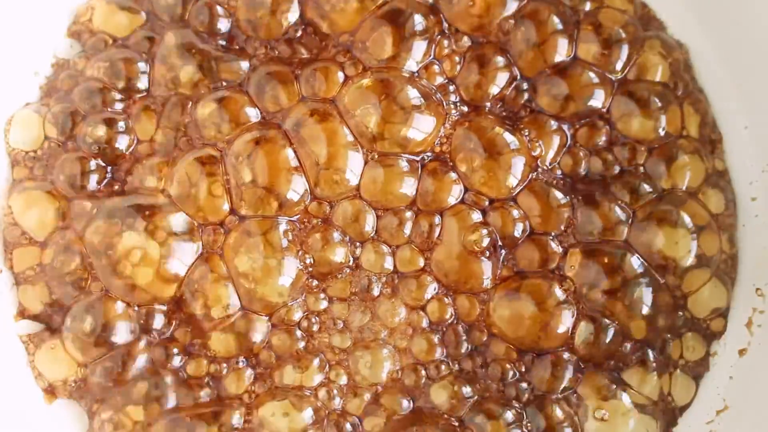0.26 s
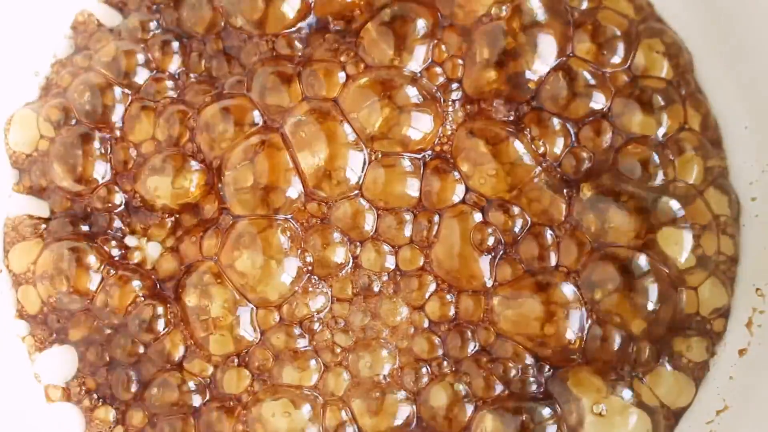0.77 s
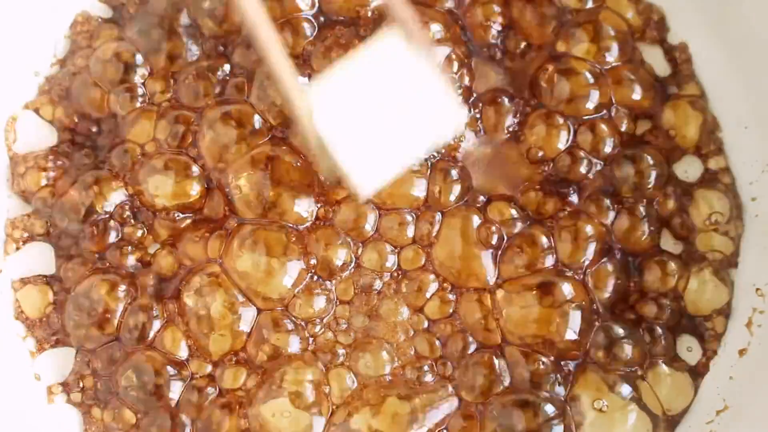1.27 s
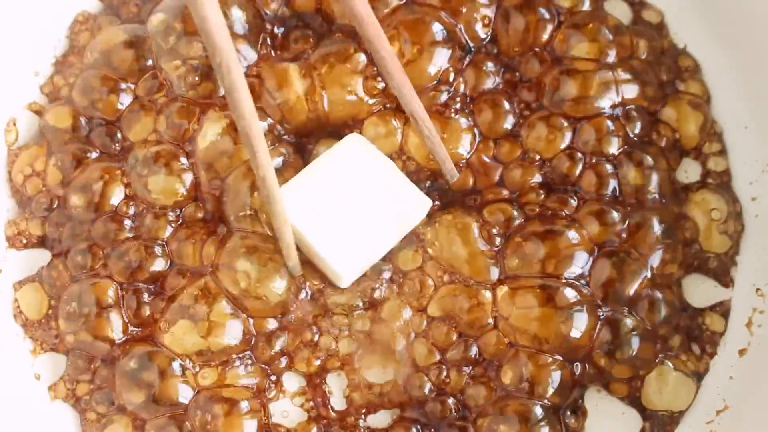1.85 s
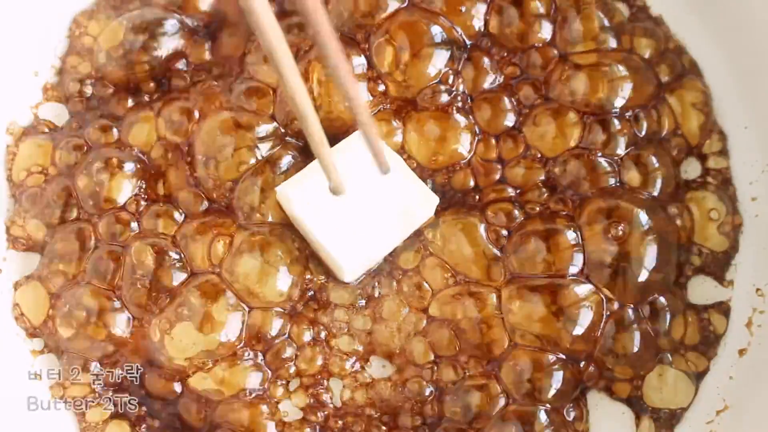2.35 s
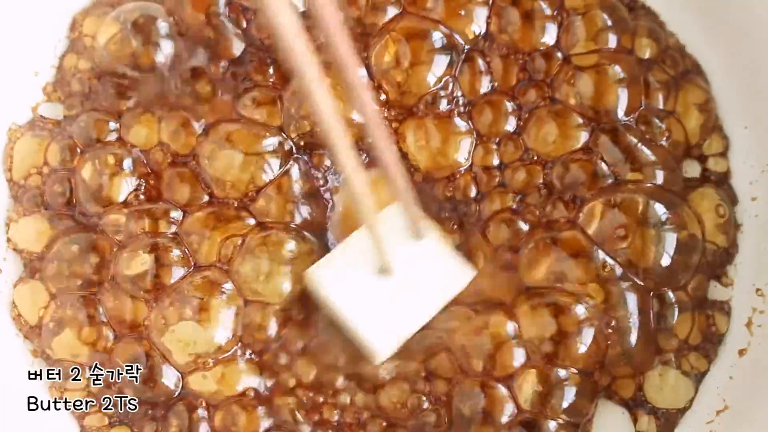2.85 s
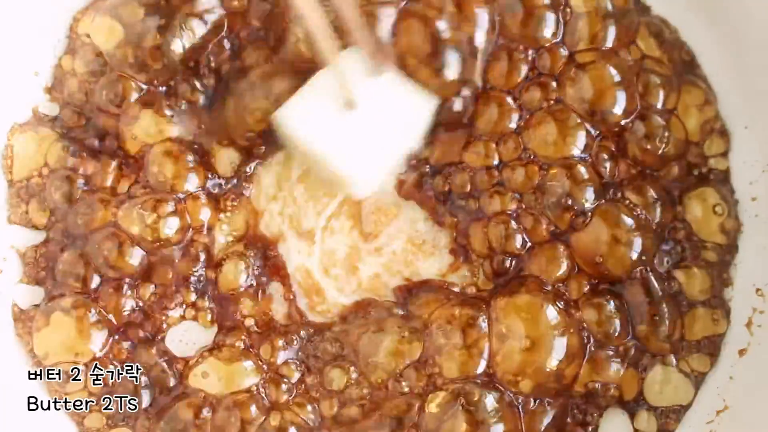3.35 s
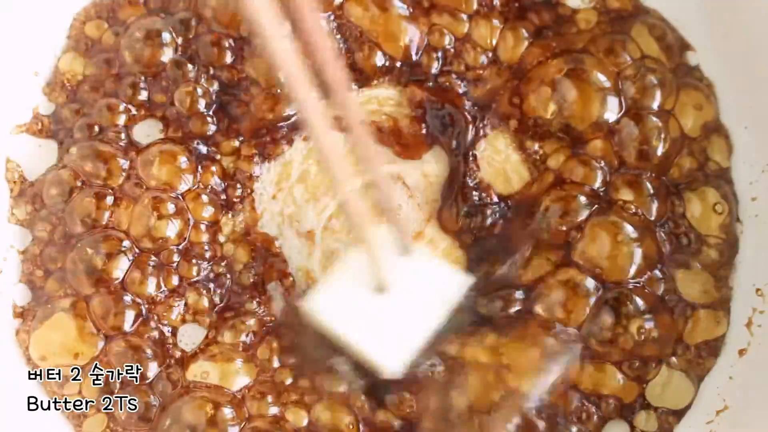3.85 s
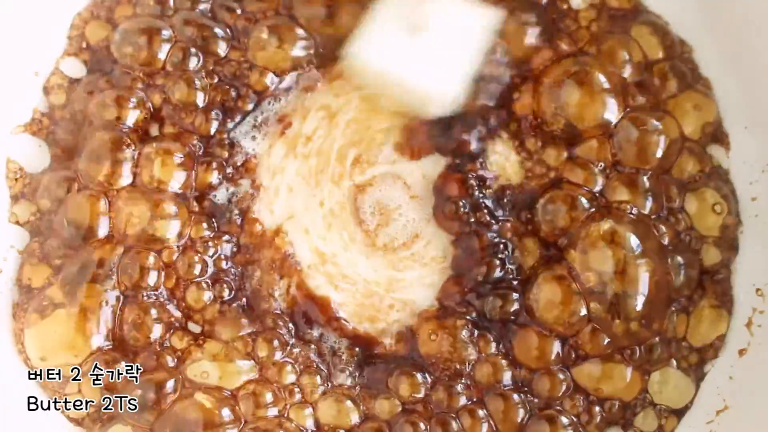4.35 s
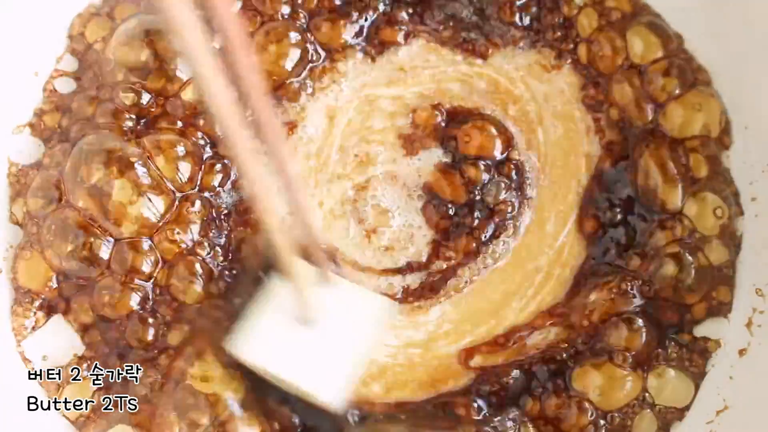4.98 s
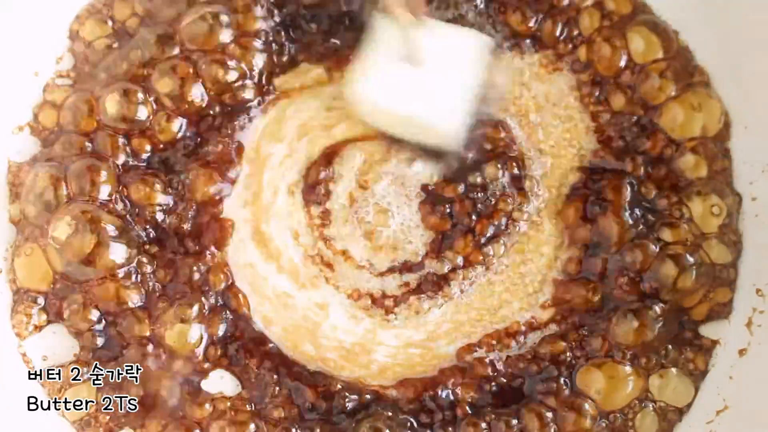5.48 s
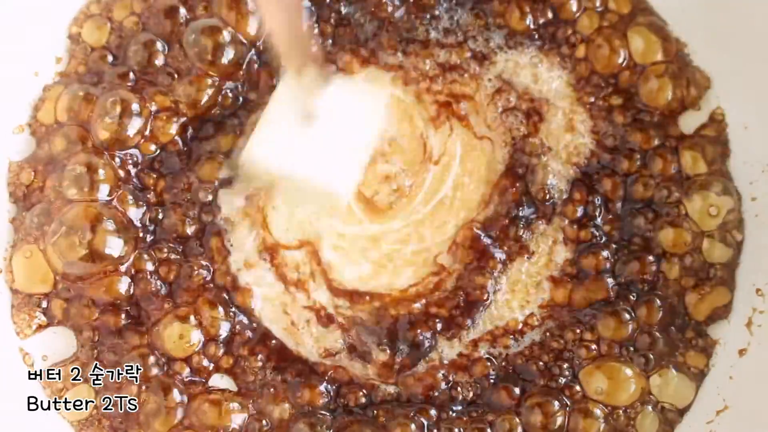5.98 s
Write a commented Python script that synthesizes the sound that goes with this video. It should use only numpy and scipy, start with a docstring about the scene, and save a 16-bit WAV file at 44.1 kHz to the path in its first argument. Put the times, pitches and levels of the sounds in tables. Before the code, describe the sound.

A portable gas burner roars softly and evenly, its thin high whistle wavering and flicking upward. Bubbling syrup sizzles faintly, with a cluster of sharp snaps near two seconds. From three seconds, butter stirred round the pan makes the sizzle thicken, with juddering hollow rubs and tiny wet plops. Low air rumble thumps throughout, strongest at the end. Close microphone, small dry kitchen, mono.

```python
"""Sugar syrup boils in a frying pan: small bubbles sizzle as dense short pings and larger ones snap.
Chopsticks stir a cube of butter round it; the sizzle thickens as the butter melts.
The strokes rub the pan as resonant, juddering noise and squeeze out soft plops of sagging pitch.
Beneath, a portable gas stove roars as coloured noise, hums in narrow bands and whistles at its jet.
Hot air buffets the microphone: swelling low-frequency noise makes the rumble and thumps."""
import sys
import numpy as np
from scipy import signal
from scipy.fft import rfft, irfft, next_fast_len
from scipy.io import wavfile
from scipy.ndimage import uniform_filter1d

SR = 44100
rng = np.random.default_rng(int(sys.argv[2]) if len(sys.argv) > 2 else 0)


def waveform_to_disk(signal):
    """Save audio, clipped to [-1, 1], as 16-bit WAV at the path in sys.argv[1]."""
    frames = np.transpose(np.atleast_2d(signal))
    scaled = np.clip(frames, -1, 1) * 32767
    samples = np.round(scaled).astype(np.int16)
    wavfile.write(sys.argv[1], SR, samples)


N = 274302
PADDED = next_fast_len(N, True)
TIME, HZ = np.arange(N) / SR, np.fft.rfftfreq(PADDED, 1 / SR)

# Frying flares as the cold butter lands, then grows as water leaves it: t/s, relative level/dB
FRYING_LEVEL = [(0, -51), (1.1, -53), (1.8, -46), (2.5, -51.5), (3.1, -44), (3.8, -41), (4.05, -38),
                (4.55, -39.5), (5.3, -37.5), (6.22, -37)]
# Spectrum of the sizzle: f/Hz, relative level/dB
SIZZLE_SPECTRUM = [(800, -44), (2500, -6.5), (4000, -3), (5200, -1), (7500, -2.5), (8900, 1.5),
                   (10800, -8.5), (12500, -4.5), (14200, -5), (15700, -14)]
# Bursts of larger bubbles: t/s, relative level over one millisecond/dB, centre f/Hz, spread/octave
LARGE_BUBBLES = [(.4993, -18, 7350, 0.14), (1.6065, -30, 12400, .15), (1.6745, -25, 6900, .2),
                 (1.713, -24.5, 5000, .11), (1.8498, -23, 5860, .25), (1.8627, -24, 6500, 0.41),
                 (1.871, -22, 7150, .28), (1.877, -25, 7000, .33), (1.9053, -20, 5600, .21),
                 (1.9331, -25, 7500, .35), (1.9938, -10.5, 6160, 0.43), (2.001, -19, 5200, 0.45),
                 (2.0025, -16, 5700, .45), (2.0102, -16, 6600, .28), (2.996, -24, 8300, .28),
                 (3.767, -25, 12000, .25), (3.984, -22, 11500, 0.47), (4.096, -22, 8950, 0.079),
                 (4.1445, -25, 13300, .1), (4.2198, -24, 13500, .25), (4.392, -23, 12400, .2),
                 (4.597, -19, 6760, 0.18), (4.9145, -17, 6500, .38), (4.9285, -21, 9000, .3),
                 (4.956, -20, 8000, .34), (4.9608, -13.5, 8840, .2), (4.961, -9, 14600, .13),
                 (5.0608, -20, 6460, 0.13), (5.231, -19, 14200, .18), (5.3719, -19, 9000, 0.74),
                 (5.426, -18.5, 7160, 0.22), (5.632, -26, 10600, 0.19), (5.679, -15.5, 10500, 0.52),
                 (5.764, -22, 8600, .48), (5.8022, -14.5, 10900, .22), (5.8514, -18, 7900, 0.16),
                 (6.1864, -17, 8800, 0.11)]
# Response of the pan's wall to a snap: f/Hz, gain/dB
PAN_WALL_RESPONSE = [(2000, 9.5), (5000, -2), (7000, -3.5), (8800, -1), (10800, -7.5), (12500, -1.5),
                     (14500, -6), (16000, 0)]
# Steam pockets in the stirred syrup: t/s, relative peak level/dB, first f/Hz, limiting f/Hz, time scale/s
STEAM_POCKETS = [(1.466, -24.5, 716, 660, 0.003), (1.519, -19, 1160, 990, 0.0014),
                 (1.525, -26, 716, 620, .0027), (1.555, -19.5, 774, 484, 0.0022),
                 (1.56, -21.5, 670, 585, .004), (2.702, -29, 785, 700, 0.0038),
                 (2.998, -22, 1320, 1230, .0037), (3.04, -27, 720, 640, 0.0031),
                 (3.044, -24, 1200, 990, 0.0069), (3.178, -23, 1200, 850, 0.0047),
                 (3.187, -22.5, 760, 450, 0.0059), (3.217, -22.5, 1090, 700, .0013),
                 (3.901, -22, 520, 280, 0.0013), (4.397, -17, 730, 600, 0.0015),
                 (4.413, -24, 750, 650, 0.0021), (4.451, -27.5, 720, 600, 0.0028),
                 (4.48, -28, 766, 726, 0.0041), (4.755, -27, 630, 564, 0.0022),
                 (4.866, -24.5, 680, 620, 0.0017), (5.015, -23, 730, 560, 0.0021),
                 (5.192, -21.5, 730, 450, 0.002), (5.403, -20, 850, 524, 0.0033)]
# Spectrum of the wet splash round a plop: f/Hz, relative level/dB
SPLASH_SPECTRUM = [(100, 4), (240, 2), (450, -11), (700, -2), (1200, -2), (2500, -24), (5000, -32)]
# Strokes that rub the butter over the pan's bottom: start t/s, length/s, relative level/dB
STIRRING_STROKES = [(2.95, 0.48, -38), (3.874, 0.65, -37), (4.986, 0.51, -35.5), (5.85, 0.14, -37)]
# Resonances of the rubbed pan: f/Hz, width/Hz, relative level/dB
RUB_RESONANCES = [(268, 690, -16.5), (1246, 94, -1), (1420, 270, -6.5)]
# Spectrum of the flame: f/Hz, relative level/dB
FLAME_SPECTRUM = [(100, 0.5), (160, -9), (250, -7.5), (440, -12.5), (700, -1), (860, -5.5), (1030, 1.8),
                  (1500, -1), (2100, 0.94), (2450, -2.4), (3100, -7.5), (4500, -12.5), (6500, -13.5),
                  (9000, -20), (10500, -24), (16000, -25)]
# Roar of the flame before flutter: t/s, level/dB
FLAME_LEVEL = [(0, -33.5), (6.22, -35)]
# Narrow bands of the stove, low hums and jet whistles: f/Hz, width/Hz, level/dB
STOVE_BANDS = [(221, 6.9, -50), (266.7, 11, -57), (371, 34, -58), (5005, 41, -55), (6590, 48, -49),
               (6200, 19, -66), (6820, 18, -54), (7190, 61, -48), (8000, 49, -61.5), (8340, 50, -54)]
# Main whistle of the gas jet before sway and dips: t/s, level/dB
JET_LEVEL = [(0, -37.5), (.25, -46), (.68, -35), (1.3, -40.5), (1.85, -42), (3.35, -36.5), (3.7, -41.5),
             (6.22, -40.5)]
# Brief slips of the jet into its upper whistle: t/s, peak level/dB
JET_SLIPS = [(1.12, -34), (1.79, -38), (1.915, -34.5), (2.33, -37), (2.392, -41), (2.52, -38), (2.82, -38),
             (3.65, -36), (3.852, -36), (4.035, -33), (4.484, -37), (5.69, -40)]
# Air flow between puffs: t/s, large-eddy relative level/dB, small-eddy relative level/dB
AIR_FLOW = [(0, -28.5, -61), (.62, -24.5, -46), (.88, -22, -41), (1.38, -22, -54), (1.7, -21, -34.5),
            (2.2, -18.5, -43), (2.9, -19.5, -31.5), (3.6, -18.5, -36.5), (5.3, -19, -41),
            (5.85, -11.5, -22), (6.22, -11, -20.5)]
# Puffs of hot air: t/s, relative level/dB, relative length/s, small eddies relative to large/dB
AIR_PUFFS = [(0.716, -13, 0.032, -28), (0.894, -13.5, 0.088, -14), (1.163, -10, 0.08, -20),
             (1.466, -11.5, 0.078, -23), (1.708, -8, 0.042, -12), (1.88, -11.5, 0.062, -21),
             (1.993, -11, 0.086, -20), (2.218, -8, 0.032, -19), (2.39, -13, 0.064, -23),
             (2.656, -7.5, 0.028, -14), (2.747, -11.5, 0.034, -25), (2.889, -16, 0.038, -7),
             (3.162, -16, 0.04, -5), (3.316, -14, 0.082, -12.5), (3.513, -6.5, 0.028, -19),
             (3.613, -6, 0.042, -33), (3.734, -11, 0.085, -30), (4.008, -12, 0.043, -8),
             (4.12, -7.5, 0.023, -19), (4.198, -12, .05, -20), (4.354, -6.5, 0.021, -12),
             (4.492, -3.5, 0.03, -26), (4.706, -11.5, 0.093, -12), (4.828, -10.5, 0.019, -17),
             (5.243, -10, 0.027, -33), (5.363, -15, 0.046, -10), (5.482, -12, 0.1, -34),
             (5.563, -18, 0.03, -23), (5.727, -9, 0.018, -10), (5.802, -4.5, 0.035, -17),
             (6.166, -11.5, 0.034, -6)]
# Spectrum of the large eddies: f/Hz, relative level/dB
LARGE_EDDY_SPECTRUM = [(8, -13), (18, 2), (27, 6), (39, -1), (50, -6), (63, -21.5), (80, -35.5), (125, -43),
                       (400, -100)]
# Spectrum of the small eddies: f/Hz, relative level/dB
SMALL_EDDY_SPECTRUM = [(40, -14), (58, 6), (68, 7.5), (80, -5), (100, -14.5), (125, -26), (180, -39),
                       (400, -57)]


def sizzle(sparse_per_s=1200, dense_per_s=8000, spread_db=5.5, cycles=2.9, clump_db=2.0, clump_hz=45, hiss_db=-2):
    """Superposition of damped oscillations: tiny steam bubbles burst more often in harder frying."""
    frying = level(FRYING_LEVEL)
    per_s = sparse_per_s + dense_per_s * frying / frying.max()
    bursts = rng.random(N) < per_s / SR
    strength = np.minimum(rng.exponential(1, N), 4.5)
    sign = rng.choice([-1, 1], N)
    pitches = np.geomspace(2000, 15500, 32)
    which = rng.choice(len(pitches), N, p=pitches / pitches.sum())  # higher pitches are likelier
    t = TIME[:256]
    pings = np.zeros(N + len(t))
    for k, hz in enumerate(pitches):
        at = np.flatnonzero(bursts & (which == k))
        ping = unit(np.sin(2 * np.pi * hz * t) * np.exp(-t * hz / cycles))
        # dividing by the root of the rate leaves the level to the frying curve
        sizes = sign[at] * amp(spread_db * strength[at]) / np.sqrt(per_s[at])
        places = at[:, None] + np.arange(len(t))
        pings += np.bincount(places.ravel(), np.outer(sizes, ping).ravel(), len(pings))
    grains = unit(colour(pings[:N], SIZZLE_SPECTRUM))
    hiss = unit(colour(noise(), SIZZLE_SPECTRUM))
    return frying * amp(clump_db * drift(clump_hz)) * (grains + amp(hiss_db) * hiss)


def snaps(snap_db=1, spray_db=-5, spray_s=0.0018, spray_rise_s=0.00088, skirt_db=-29):
    """Impulse response of a bubble wall: a tear gives a sharp ringing crack and a short spit of steam."""
    out, t, hz = np.zeros(N), TIME[:2048], np.fft.rfftfreq(2048, 1 / SR)
    # fainter bubbles burst by chance, 2.5 per second
    faint = [(s, db, 12000, 0.2) for s, db in by_chance(2.5, -37)]
    for s, db, centre_hz, octaves in LARGE_BUBBLES + faint:
        away = np.log2((hz + 1) / centre_hz)
        peak = np.exp(-(away / (2 * octaves)) ** 2)
        band = peak + amp(skirt_db) / (1 + (away / 2) ** 2)
        # minimum phase: the ring starts at once, then dies away
        log_gain = np.log(np.r_[band, band[-2:0:-1]])
        ring = np.fft.ifft(np.exp(np.conj(signal.hilbert(log_gain)))).real
        spray = rng.standard_normal(len(t)) * np.exp(-t / spray_s) * (1 - np.exp(-t / spray_rise_s))
        spit = irfft(rfft(spray) * rfft(ring))
        crack = unit(ring) + amp(spray_db) * unit(spit)
        one_ms = SR / 1000  # samples over which the energy is reckoned
        add(out, s, amp(db + snap_db) * crack * np.sqrt(one_ms / np.sum(crack ** 2)))
    return out


def plops(plop_db=-1.5, sag=0.89, splash_db=-11, splash_s=0.0088):
    """Cavity oscillation: each pocket's pitch sags as it swells, and the syrup splashes shut."""
    rings, splashes, t = np.zeros(N), np.zeros(N), TIME[:3000]
    for s, db, first_hz, last_hz, length in STEAM_POCKETS:
        age = t / length
        hz = last_hz + (first_hz - last_hz) * np.exp(-sag * age)
        swell = 2 * age * np.exp(1 - 2 * age)  # peaks at half the time scale
        add(rings, s, amp(db) * swell * np.sin(2 * np.pi * np.cumsum(hz) / SR))
        add(splashes, s, amp(db) * np.exp(-t / splash_s) * (1 - np.exp(-10 * age)))
    wet_noise = unit(colour(noise(), SPLASH_SPECTRUM))
    return amp(plop_db) * rings + amp(splash_db) * splashes * wet_noise


def stirring(rub_db=-1, judder_db=3, judder_hz=71, attack_s=0.032, release_s=0.15, ease_db_per_s=3.5):
    """Friction-driven resonance: butter judders over the pan; a stroke bites, eases and lets go."""
    pressure = np.zeros(N)
    for start, length, db in STIRRING_STROKES:
        age = np.maximum(TIME - start, 0)
        attack = np.minimum(age / attack_s, 1)
        release = np.exp(-np.maximum(age - length, 0) / release_s)
        pressure += amp(db - ease_db_per_s * age) * attack * release
    rub = sum(amp(db) * resonance(hz, width) for hz, width, db in RUB_RESONANCES)
    rub = rub * amp(judder_db * drift(judder_hz))
    return amp(rub_db) * pressure * unit(rub)


def kitchen(x, wet_db=-12, t60=0.2):
    """Reverberation: sparse decaying reflections from the pan wall, the counter and the room."""
    t = TIME[:12000]
    echoes = rng.standard_normal(len(t)) * (rng.random(len(t)) < .1) * (t > .002)
    tail = echoes * amp(-60 * t / t60)
    return x + amp(wet_db) * signal.fftconvolve(x, tail / np.linalg.norm(tail))[:N]


def flame(flutter_db=1.03, flutter_hz=30):
    """Combustion noise: the turbulent flame roars in a broad band and flutters."""
    roar = unit(colour(noise(), FLAME_SPECTRUM))
    return level(FLAME_LEVEL) * amp(flutter_db * drift(flutter_hz)) * roar


def stove_tones():
    """Resonance of turbulence: noise confined to narrow bands is heard as hums and whistles."""
    return sum(amp(db) * resonance(hz, width) for hz, width, db in STOVE_BANDS)


def whistle(hz, waver_hz=12, waver_db=2.0):
    """Unsteady self-oscillation: a sine whose frequency and amplitude waver at random, rms 1."""
    phase = 2 * np.pi * np.cumsum(hz + waver_hz * drift(39.7)) / SR
    return unit(np.sin(phase) * amp(waver_db * drift(25.5)))


def gas_jet(main_hz=6640, upper_hz=7160, sway_db=1.4, sway_hz=5.1, slip_s=0.034, dip_db=7):
    """Mode competition: the upper whistle draws its energy from the main one in brief slips."""
    main, upper = whistle(main_hz), whistle(upper_hz)
    sway = unit(amp(sway_db * drift(sway_hz)))
    # fainter slips come by chance, 3 per second
    slips = sum(amp(db) * bell(s, slip_s) for s, db in JET_SLIPS + by_chance(3, -44))
    dips = amp(-dip_db * slips / slips.max())
    return level(JET_LEVEL) * sway * dips * main + slips * upper


def draught(large_db=-1.8, small_db=-1.4, gust_db=2.5, gust_hz=11, large_lengths=1.32, small_lengths=1.43):
    """Turbulent pressure: large and small eddies ride on a gusty flow and swell with each hot puff."""
    flow = np.array(AIR_FLOW)
    gusts = amp(gust_db * drift(gust_hz))
    large_puffs = sum(amp(db) * bell(s, large_lengths * length) for s, db, length, _ in AIR_PUFFS)
    small_puffs = sum(amp(db + fine_db) * bell(s, small_lengths * length)
                      for s, db, length, fine_db in AIR_PUFFS)
    # flow and puffs add in power
    large = np.hypot(large_puffs, gusts * level(flow[:, [0, 1]]))
    small = np.hypot(small_puffs, gusts * level(flow[:, [0, 2]]))
    rumble = amp(large_db) * large * buffet(LARGE_EDDY_SPECTRUM)
    return rumble + amp(small_db) * small * buffet(SMALL_EDDY_SPECTRUM)


def buffet(spectrum):
    """Low-frequency turbulence, its slow envelope evened out by its local power."""
    eddies = signal.hilbert(unit(colour(noise(), spectrum)), PADDED)[:N]
    power = uniform_filter1d(abs(eddies) ** 2, size=3600)
    return unit(eddies.real / np.sqrt(power + 0.037))


def amp(db):
    """Level law: decibels to amplitude gain."""
    return 10 ** (np.asarray(db) / 20)


def unit(x):
    """Normalisation to rms 1."""
    return x / np.sqrt(np.mean(x ** 2) + 1e-20)


def level(curve):
    """Interpolation of rows t/s, level/dB to a gain at every sample."""
    return amp(np.interp(TIME, *np.transpose(curve)))


def colour(x, spectrum):
    """Linear filtering by rows f/Hz, level/dB, interpolated over log frequency."""
    hz, db = np.transpose(spectrum)
    gains = amp(np.interp(np.log(HZ + 1), np.log(hz), db))
    return irfft(rfft(x, PADDED) * gains, PADDED)[:N]


def noise():
    """White noise: independent Gaussian samples."""
    return rng.standard_normal(N)


def filtered_noise(gains):
    """Spectral shaping: noise with a given gain at each frequency, rms 1."""
    return unit(irfft(rfft(noise(), PADDED) * gains, PADDED)[:N])


def drift(rate_hz):
    """Low-pass noise: a random wander of rms 1, its amplitude halved at rate_hz."""
    return filtered_noise(1 / (1 + np.square(HZ / rate_hz) ** 2))


def resonance(hz, width):
    """Resonant filtering: turbulence in one steep resonance, about width Hz wide at half power, rms 1."""
    return filtered_noise(1 / (1 + ((HZ - hz) / (0.76 * width)) ** 2))


def bell(s, length):
    """Smooth envelope of height 1 round time s, down to a quarter half a length away."""
    return 1 / (1 + (2 * (TIME - s) / length) ** 2) ** 2


def by_chance(per_s, db, scatter_db=1.5):
    """Poisson process: rows t/s, level/dB with exponential waiting times."""
    when, size = rng.random((100, 2)).T
    times = np.cumsum(-np.log(1 - when)) / per_s
    return [(s, db + scatter_db * (2 * u - 1)) for s, u in zip(times, size) if s < TIME[-1]]


def add(mix, s, sound):
    """Superposition: adds a sound to the mix in place from time s."""
    part = mix[max(round(s * SR), 0):][:len(sound)]
    part += sound[:len(part)]


def scene():
    """Superposition of the reverberant pan, the burner and the draught, in one channel."""
    pan = sizzle() + colour(snaps(), PAN_WALL_RESPONSE) + plops() + stirring()
    burner = flame() + stove_tones() + gas_jet()
    return (kitchen(pan) + burner + draught())[None]


def record(dry, edge_hz=15900):
    """Band limitation: clips at full scale, then low-passes at edge_hz."""
    low_pass = signal.firwin(401, edge_hz, window=("kaiser", 8), fs=SR)
    return signal.oaconvolve(np.clip(dry, -1, 1), low_pass[None], "same")


dry = scene()
out = record(dry)
waveform_to_disk(out)
```